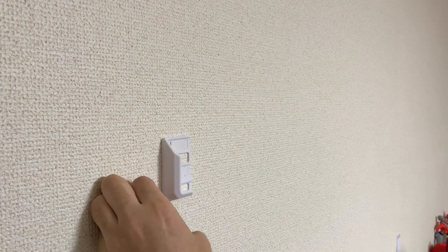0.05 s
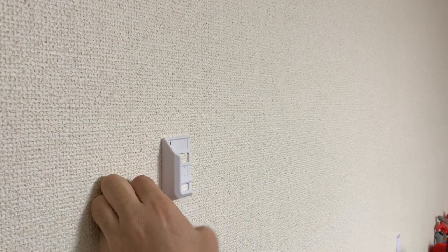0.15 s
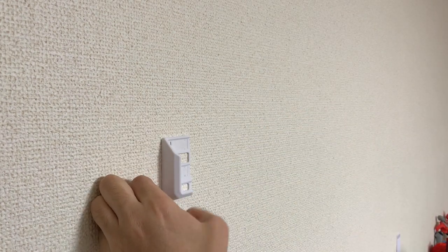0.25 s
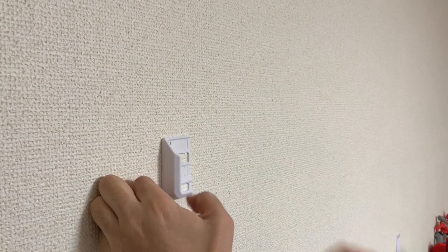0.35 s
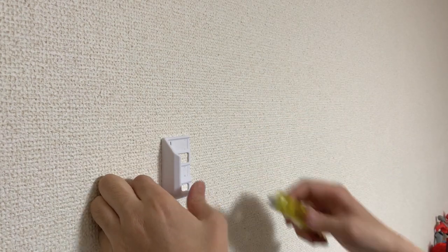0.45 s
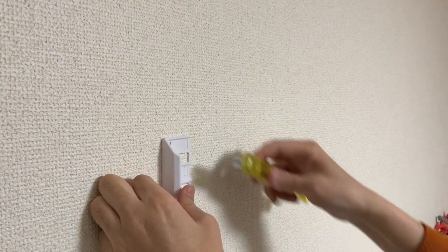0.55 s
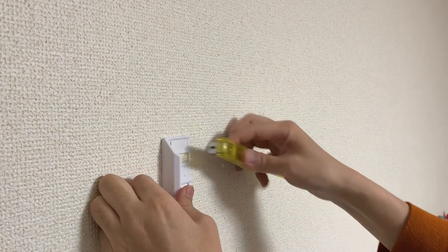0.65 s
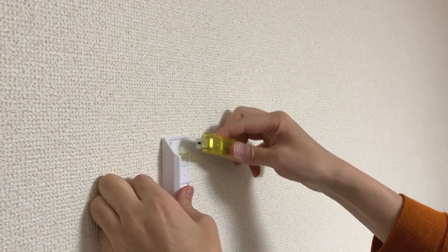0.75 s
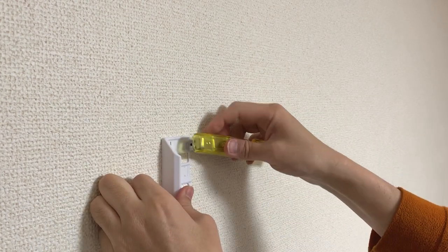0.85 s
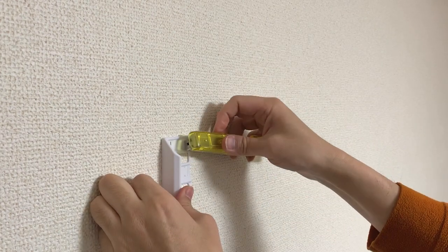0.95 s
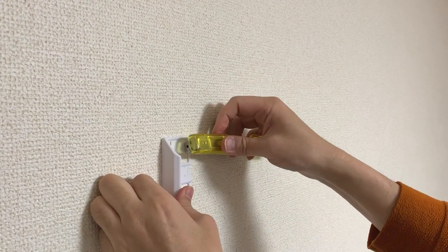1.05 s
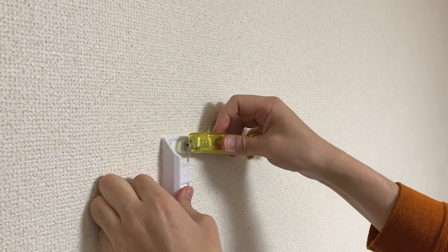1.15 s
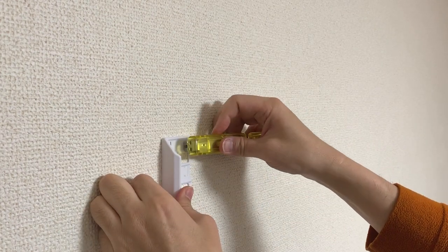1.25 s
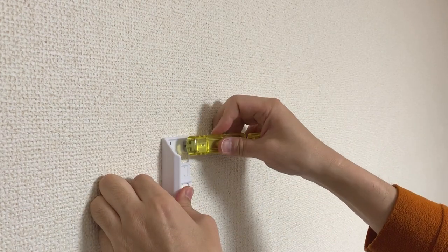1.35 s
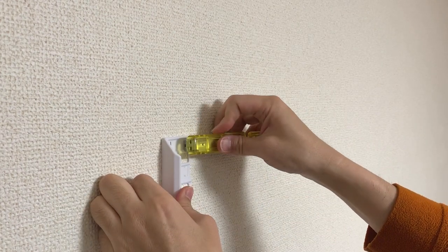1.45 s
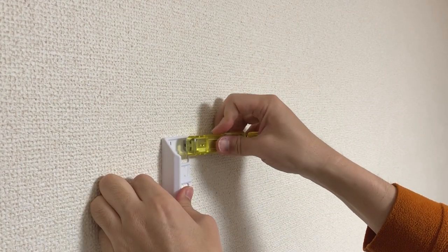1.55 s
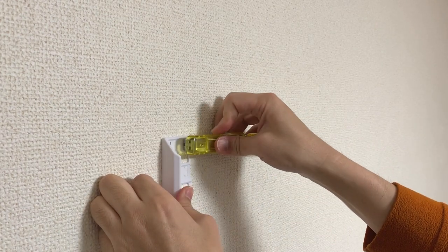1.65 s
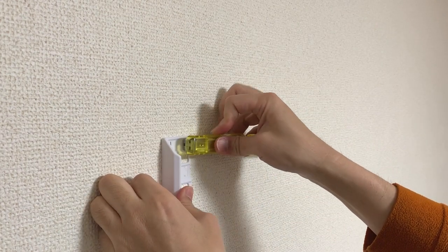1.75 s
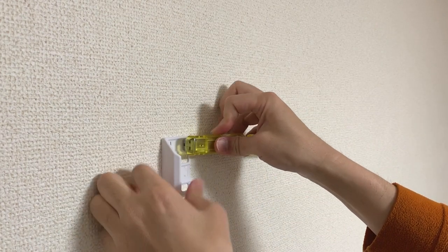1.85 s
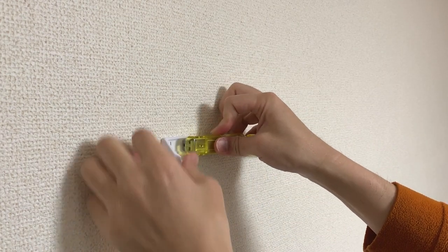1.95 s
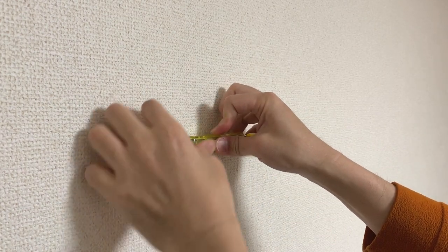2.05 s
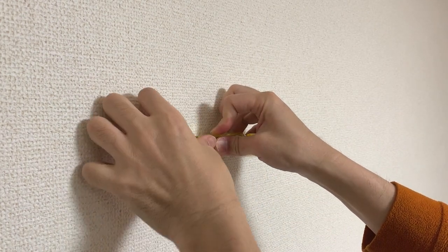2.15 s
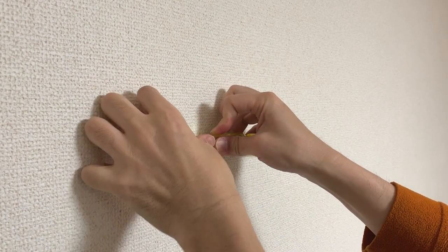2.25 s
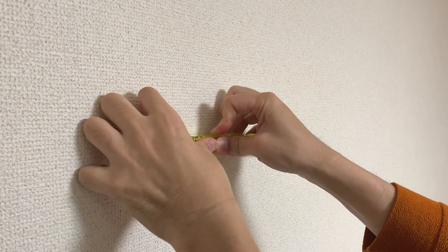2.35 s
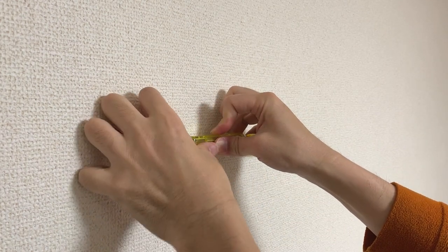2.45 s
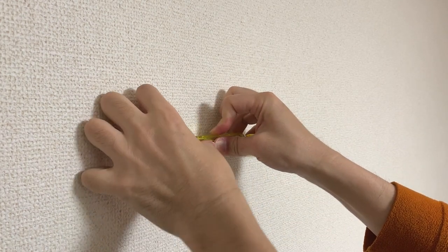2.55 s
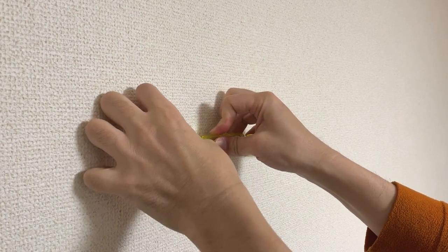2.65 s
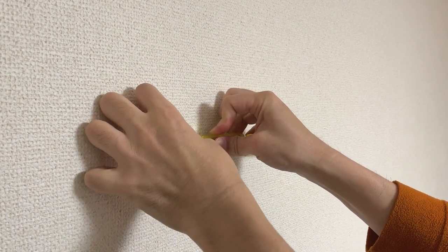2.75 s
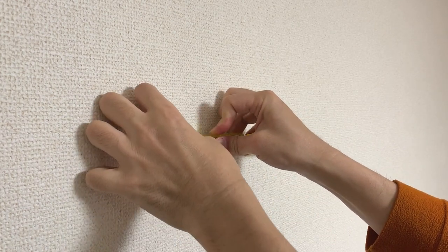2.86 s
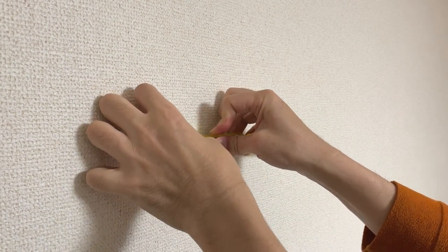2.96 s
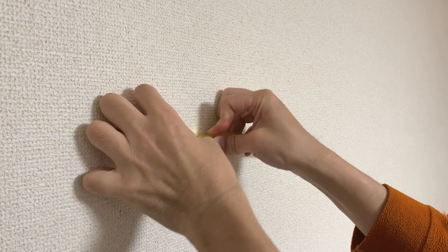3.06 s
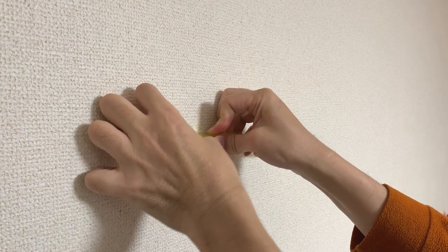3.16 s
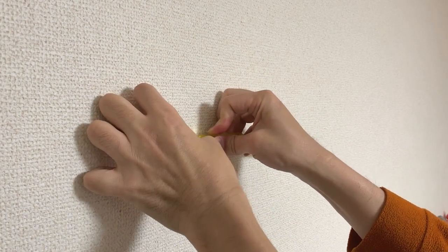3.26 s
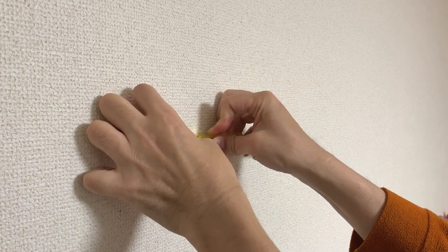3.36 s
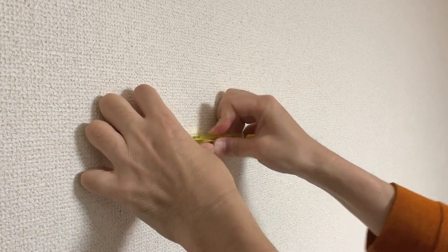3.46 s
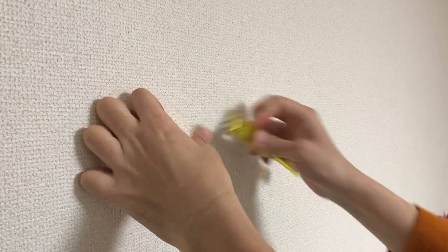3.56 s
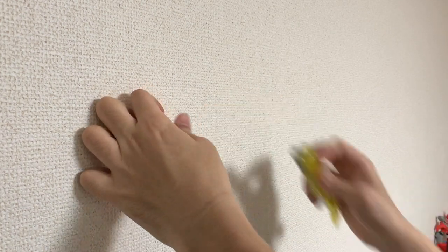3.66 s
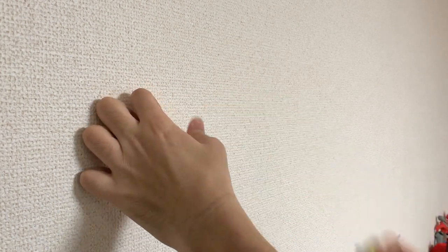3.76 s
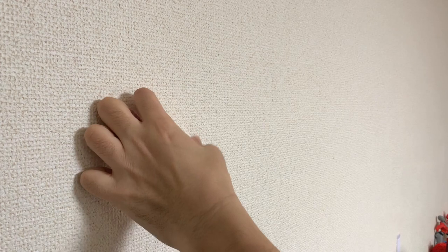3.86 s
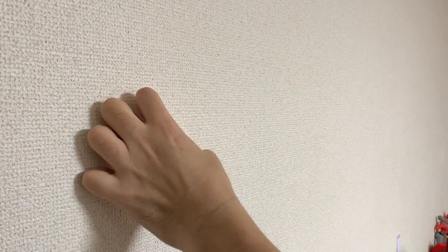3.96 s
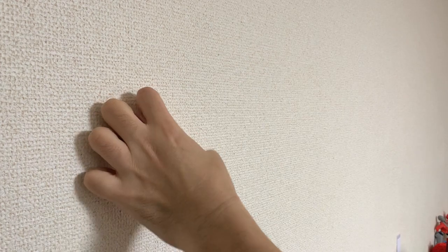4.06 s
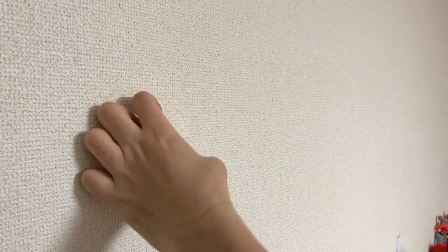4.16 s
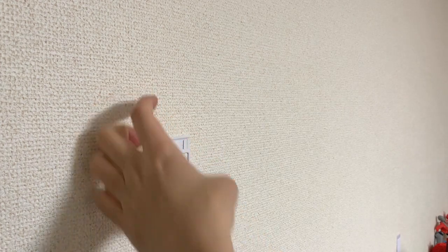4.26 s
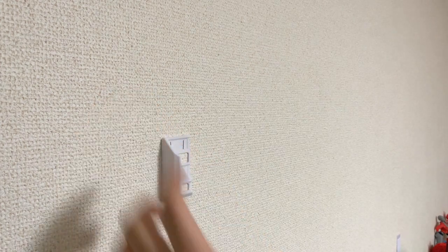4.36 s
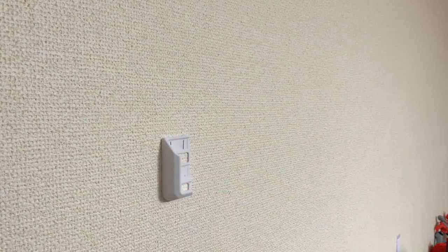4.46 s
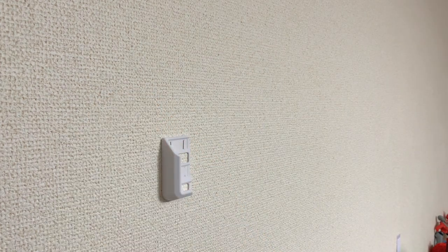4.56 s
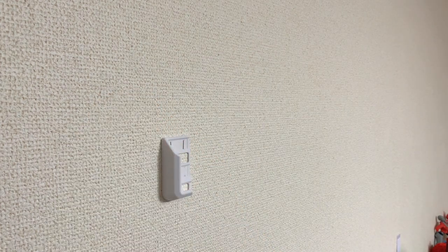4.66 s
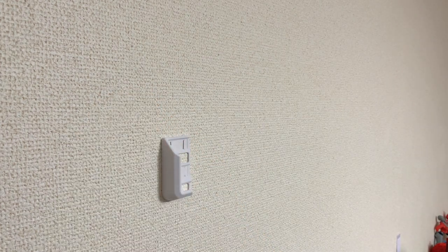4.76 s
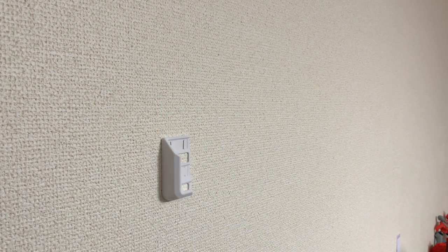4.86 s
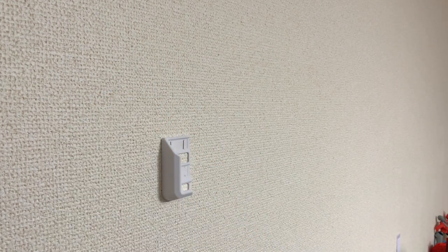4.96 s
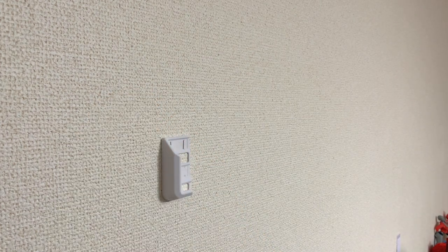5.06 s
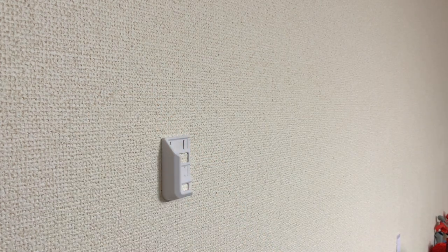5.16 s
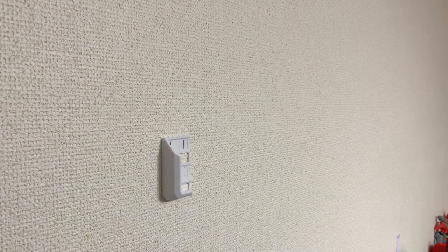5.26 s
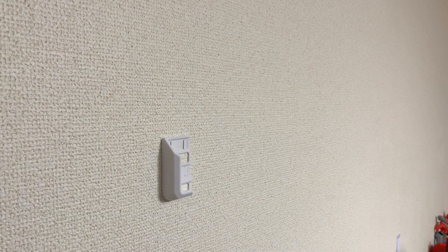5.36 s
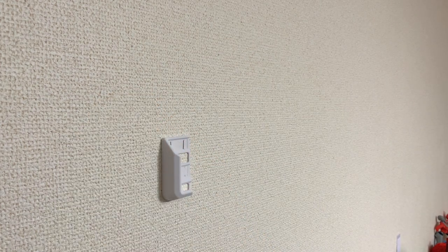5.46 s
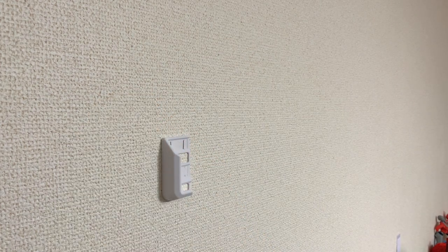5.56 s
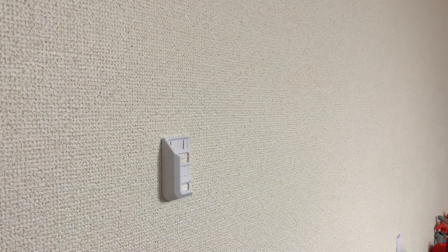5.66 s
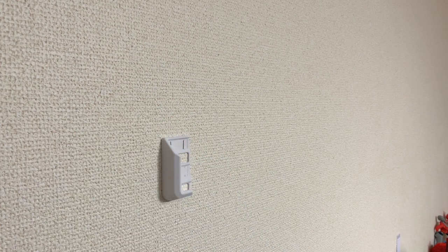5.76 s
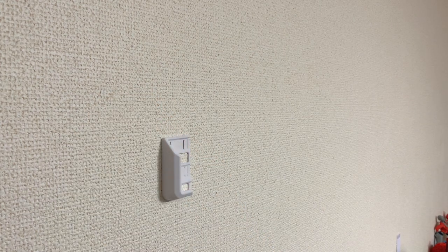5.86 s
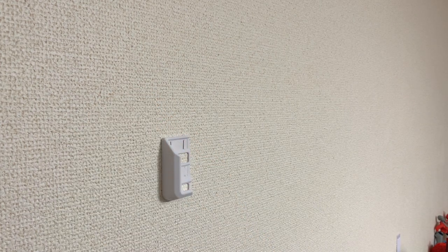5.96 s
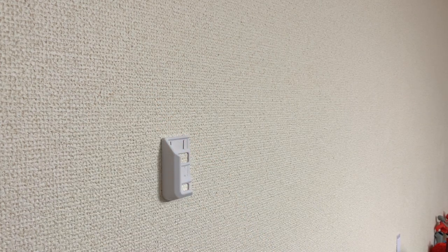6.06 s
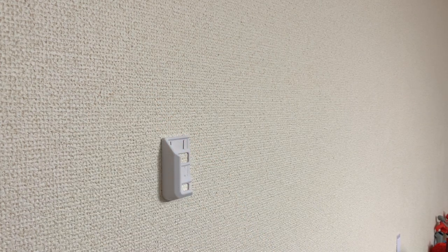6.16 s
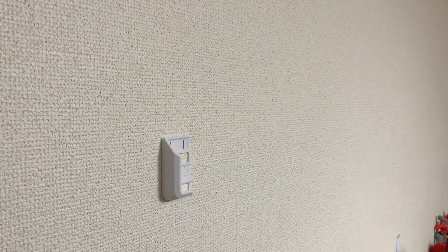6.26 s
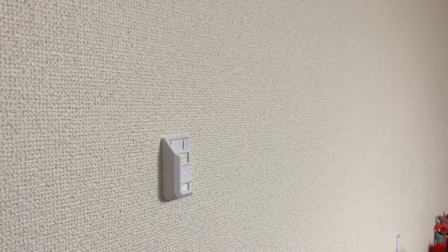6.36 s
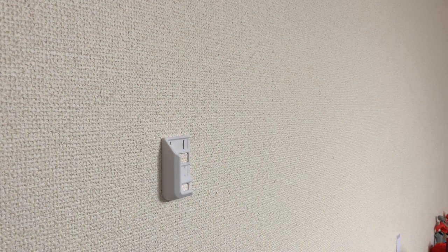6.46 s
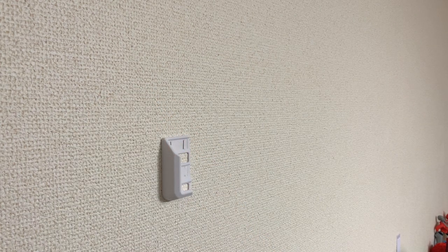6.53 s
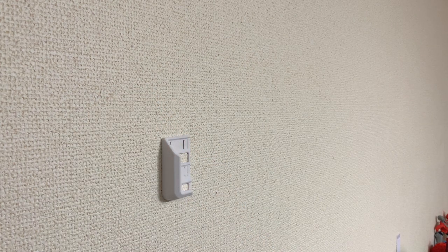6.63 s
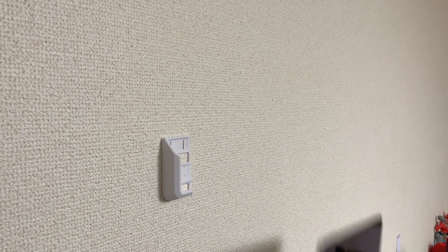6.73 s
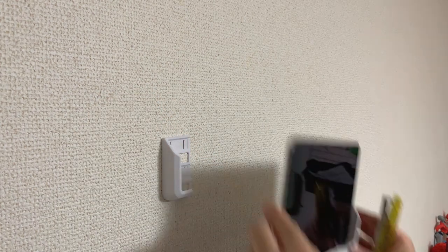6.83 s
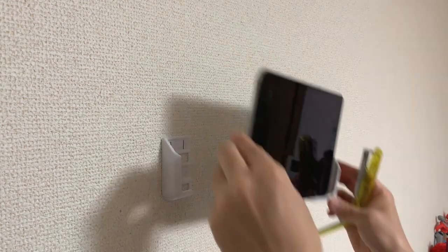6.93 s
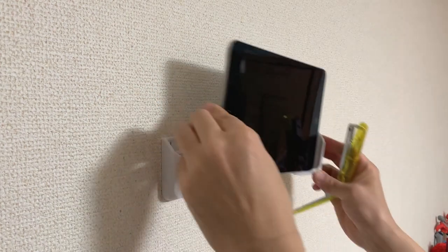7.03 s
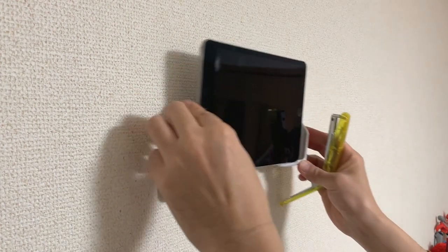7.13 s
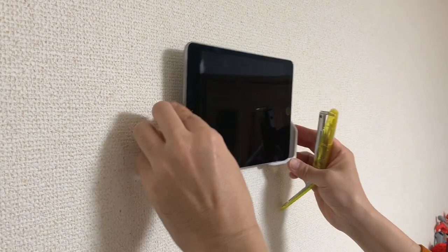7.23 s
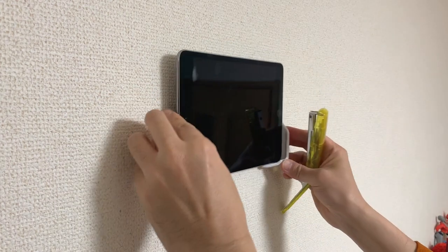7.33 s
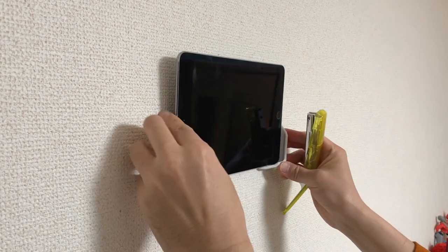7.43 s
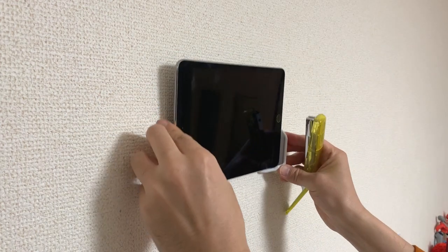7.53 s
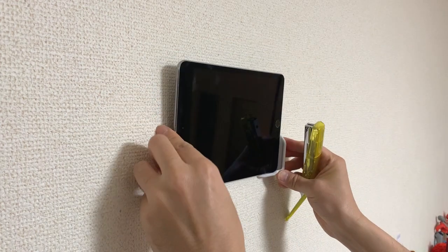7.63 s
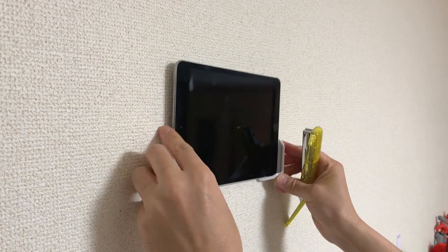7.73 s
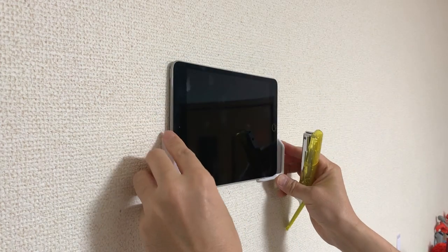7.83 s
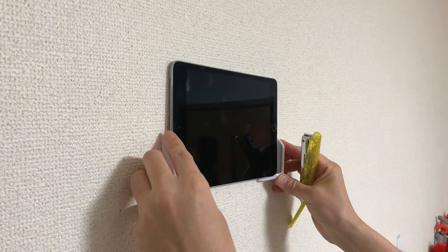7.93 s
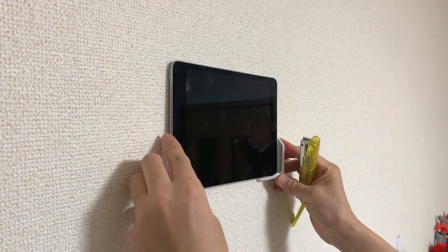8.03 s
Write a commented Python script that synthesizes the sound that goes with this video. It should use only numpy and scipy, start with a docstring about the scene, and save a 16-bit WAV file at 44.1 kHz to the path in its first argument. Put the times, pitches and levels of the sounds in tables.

```python
"""A small quiet room, a two-port microphone close to a hollow plaster wall.
First, hands rub and tap the wall, a plastic bracket and a tablet. At 2.6 s and 3.1 s a hand stapler
drives a staple through the bracket: a brief swell, a crack, the wall booms, the feed spring twangs.
At 3.5 s the stapler springs open and its steel arm rings out. From 4 s the hands are back,
scraping and tapping, and bump plastic against the wall near the end."""
import sys
import numpy as np
from scipy import signal
from scipy.fft import rfft, irfft, next_fast_len
from scipy.io import wavfile
from scipy.ndimage import uniform_filter1d

SR = 44100
rng = np.random.default_rng(int(sys.argv[2]) if len(sys.argv) > 2 else 0)


def bounce(signal):
    """Save signal as a 16-bit WAV file at the path given by the first command-line argument."""
    frames = np.transpose(np.atleast_2d(signal))
    limited = np.clip(frames, -1, 1)
    pcm = np.round(limited * 32767).astype(np.int16)
    wavfile.write(sys.argv[1], SR, pcm)


N = 356769

# the quiet room at the microphone: (frequency [Hz], level [dB])
ROOM_TONE = [(12, -37), (20, -5), (98, 0), (442, -25), (953, -23.5), (1190, -30.5), (2050, -33.5),
             (4180, -41.5), (5810, -45.5), (8300, -40), (10100, -48), (12500, -45), (14000, -65)]
# how alike the two ports hear the room tone: (frequency [Hz], coherence [0-1])
PORT_COHERENCE = [(60, 1), (180, 0.94), (520, 0.14), (1550, 0.04), (4580, 0.063), (13500, 0.04)]
# the room tone's deep bass grows: (time [s], gain [dB])
BASS_GROWTH = [(0, -4.5), (1.5, 2), (4, 1.95), (6.5, 4), (7.3, 9), (8.09, 10.5)]
# the room's reverberation: (frequency [Hz], t60 [s], relative level [dB])
ROOM_DECAY = [(79.5, 0.95, -11), (200, 0.3, -1.5), (562.6, 0.04, -1), (1500, 0.25, -7), (3900, 0.28, -7.5),
              (10360, 0.2, -3)]
# reflections off nearby walls: (delay [s], level [dB])
WALL_ECHOES = [(0.009, -19), (.023, -20), (.049, -16.5)]
# the hollow plaster panel: (frequency [Hz], relative level [dB], t60 [s])
WALL_MODES = [(115, -14, 0.074), (158, -5.5, 0.067), (219, 2, 0.016), (251, -4, 0.048), (271, -7, 0.031),
              (330, -5, 0.067), (434, -5, 0.036), (518, -0.5, 0.043), (572.5, -3.5, 0.12), (607, -4, 0.092),
              (642, -11, 0.17), (848, -6, .11), (876, -11, 0.14), (962, -13, 0.14), (1190, -12.5, 0.026),
              (1415, -5.5, 0.071), (1754, -14.5, 0.045)]

# friction spectra of wall, plastic, and skin and sleeve: (frequency [Hz], level [dB])
RUMBLE_SPECTRUM = [(50, -32.5), (100, 0), (170, -2), (300, 2.5), (450, 0), (700, -18), (1300, -23),
                   (2500, -61)]
SCRAPE_SPECTRUM = [(530, -24.5), (900, -3), (1270, -7), (1610, -7.5), (1900, -5.5), (3150, -18.5),
                   (3940, -13), (4580, -18), (6000, -30), (7800, -59), (13200, -120)]
HISS_SPECTRUM = [(2650, -4.5), (4500, 0), (5540, -1.5), (7300, 4.5), (8660, -1), (10400, -17), (12000, -6),
                 (13300, -8), (14000, -40)]
# a hand or an object slides:
# (start [s], rise [s], droop [s], rumble [dB], scrape [dB], hiss [dB], resonance [Hz])
HAND_STROKES = [(.708, 0.017, 0.026, -56, -93, -103, 4270), (.86, 0.037, 0.032, -76.5, -82, -81, 4100),
                (.995, 0.0026, 0.022, -38.5, -61.5, -81, 2250),
                (1.025, 0.019, 0.14, -46.5, -85, -102, 2240), (1.27, 0.052, 0.042, -58.5, -76, -100, 1710),
                (1.425, 0.0095, 0.0079, -46, -65, -59, 5100),
                (1.575, 0.0043, 0.062, -76, -66.5, -72.5, 3640), (1.66, 0.069, 0.01, -52.5, -99, -99, 1380),
                (1.76, 0.036, 0.018, -64, -79, -82, 2540), (1.9, 0.028, 0.11, -55.5, -78.5, -80, 1370),
                (2.05, 0.047, 0.082, -60.5, -77, -88, 1320), (2.23, 0.036, 0.027, -87, -74, -99, 4250),
                (2.4, 0.036, 0.028, -81, -74.5, -76, 1662), (4.112, 0.004, 0.044, -48, -59.5, -73, 1520),
                (4.15, 0.008, 0.16, -60, -72.5, -88, 4500), (4.25, 0.04, 0.039, -54, -79, -86, 1350),
                (4.602, 0.0046, 0.037, -63, -60.5, -55.5, 4600),
                (4.71, 0.072, 0.071, -81.5, -77.5, -86, 3680),
                (4.86, 0.021, 0.097, -65.5, -60, -65.5, 2230),
                (5.11, 0.007, 0.058, -79, -67.5, -71.5, 4820),
                (5.148, 0.0022, 0.021, -77.5, -81, -52, 4700), (5.19, 0.033, 0.071, -70, -71, -67.5, 4180),
                (5.56, 0.0011, 0.024, -44.5, -54, -54, 1820), (5.605, 0.075, 0.066, -67, -66, -59.5, 4070),
                (5.65, 0.065, 0.054, -54, -60.5, -63, 1810), (5.74, 0.036, 0.065, -52.5, -67, -73, 1341),
                (5.83, 0.009, 0.17, -61, -80, -74, 2130), (5.96, 0.08, 0.025, -71, -66, -66, 2350),
                (6.11, 0.075, 0.11, -74, -72, -62.5, 2200), (6.39, 0.054, 0.12, -62, -72.5, -88, 2260),
                (6.585, 0.011, .04, -81, -65.5, -84, 2460), (6.63, 0.031, .025, -82, -62, -63, 2260),
                (6.74, 0.0085, 0.03, -77.5, -60.5, -88, 2150), (7.202, 0.0068, 0.097, -49, -65, -68, 2400),
                (7.311, 0.0018, 0.039, -49, -51.5, -65, 2570), (7.39, 0.015, 0.055, -47.5, -55, -76, 1420),
                (7.598, 0.0019, 0.048, -34, -49, -61.5, 3930),
                (7.64, 0.016, 0.0089, -38.5, -50.5, -84, 1820), (7.74, 0.071, 0.0063, -51, -57, -79, 3900)]
# hands resting and shifting between strokes: (time [s], rumble [dB], scrape [dB])
RESTING_HANDS = [(0, -73.5, -95), (.95, -104, -99), (1.25, -69, -94), (1.5, -56.5, -81), (1.85, -68.5, -92),
                 (2.201, -75, -100), (2.5, -70, -103), (2.621, -99, -99), (3.751, -85.5, -99.5),
                 (4.001, -65, -82.5), (4.25, -83, -94), (4.401, -85, -79), (4.599, -75, -101),
                 (5.051, -74, -79), (5.4, -66, -79.5), (5.899, -69.5, -68.5), (6.55, -70, -78),
                 (6.851, -60.5, -74), (7.18, -62.5, -74.5), (7.499, -51, -63.5), (7.75, -52, -64.5),
                 (7.9, -56.5, -73), (8.09, -62, -75)]
# plastic bumps the wall: (time [s], level [dB], pitch [Hz], t60 [s])
PLASTIC_BUMPS = [(0.997, -27, 240, 0.049), (1.005, -25, 181, 0.06), (1.039, -27, 182, 0.095),
                 (1.069, -35, 230, 0.059), (1.113, -31.5, 206, 0.12), (1.144, -31, 265, 0.087),
                 (1.189, -39, 222, 0.08), (1.334, -45.5, 454, 0.096), (1.357, -35.5, 482, 0.036),
                 (1.442, -37, 370, 0.04), (1.527, -34, 229, 0.04), (1.571, -55, 221, 0.074),
                 (1.631, -33.5, 227, 0.073), (5.56, -35, 370, 0.051), (7.206, -24.5, 285, 0.078),
                 (7.212, -32.5, 191, 0.07), (7.244, -34, 211, 0.08), (7.324, -36, 245, 0.08),
                 (7.464, -24, 450, 0.022), (7.476, -24, 377, 0.038), (7.502, -46, 428, 0.08),
                 (7.549, -39, 384, 0.14), (7.6, -29, 275, 0.044), (7.611, -23.5, 381, 0.066),
                 (7.631, -34, 300, 0.067), (7.644, -27, 226, 0.08), (7.799, -39, 253.4, 0.12),
                 (7.82, -34.5, 174.6, 0.13)]
# fingers and plastic tap:
# (time [s], crack [dB], wall knock [dB], clack [Hz], clack over crack [dB], tilt [dB/octave])
LIGHT_TAPS = [(0.462, -58, -63, 1280, -14, 6), (0.5374, -54.5, -87, 1820, 2, 3),
              (0.543, -50.5, -75, 3740, 16, -2), (0.713, -56.5, -75, 4140, 16, 11),
              (0.911, -51.5, -70, 4070, 13, 8), (0.9939, -36, -49, 2340, -20, 18),
              (1.2971, -42, -55, 900, -14, -9), (1.3123, -50, -57, 1600, -6, -1),
              (1.4304, -40, -38, 8700, 1, -8.5), (1.575, -52, -50, 3380, 8, 1),
              (1.627, -50, -29, 1060, 1, 3), (1.7828, -58, -69, 2630, 1, -1),
              (2.429, -70, -74, 1710, -14.5, 7.5), (4.1104, -45, -34, 1560, -15, 10),
              (4.15, -40.5, -42, 4400, 0.5, 8), (4.1597, -44, -43.5, 4330, -18, 0),
              (4.6022, -38, -63, 4600, -8, 9), (4.609, -47, -70, 4730, 9, 7), (4.757, -58, -75, 4240, 8, 2),
              (4.798, -57, -67, 4620, 5, 2), (4.877, -52, -43, 1726, -20, -10),
              (4.9555, -49, -73, 2330, 11, -7), (5.1465, -43.5, -74, 7290, -29, 8),
              (5.561, -37.5, -40, 1830, -6, 2), (5.673, -38, -63.5, 1800, -7, 16),
              (5.7057, -42.5, -62, 1740, 9, -6), (5.7642, -41, -58, 1160, -25, -7.5),
              (5.8146, -41, -72, 2200, 3, 6.5), (5.8608, -42.5, -38, 1820, -11, 4.5),
              (6.032, -45, -39, 2220, -1, 6), (6.3014, -51.5, -57, 3345, -1, 5),
              (6.443, -45.5, -64, 2366, -14, 12), (6.6478, -49, -65, 2200, 6, 4),
              (6.7422, -41, -60, 1744, -7, 3), (7.202, -46, -20.5, 3500, -8, -9),
              (7.3107, -39.5, -32, 1840, -4, 0), (7.323, -42, -53, 2450, 2, -3.5),
              (7.333, -47, -50, 2600, 8, -6), (7.3868, -39.5, -46, 4000, 1, 0.5),
              (7.408, -39.5, -24, 1194, -2, -4), (7.4645, -40, -42, 990, 3, -8),
              (7.506, -55, -60, 4000, 4, 8), (7.599, -38.5, -15, 3850, -21, 0.5),
              (7.629, -35, -31.5, 1470, -5, -3), (7.636, -40, -19, 935, 8, -2),
              (7.644, -38.5, -55, 4440, 7, -4), (7.658, -37.5, -57, 4700, 2, -1),
              (7.6594, -36, -47, 1750, 4, -18), (7.699, -45.5, -42, 1490, -20, -4),
              (7.776, -49, -49, 3970, 11, -6), (7.787, -45, -60, 3890, 8, -8),
              (7.7918, -39.5, -52, 4010, 15, -7), (7.797, -55, -45, 3990, 3, -3),
              (7.8193, -41, -27.5, 1940, -10, -8), (7.8403, -45.5, -65.5, 1515, -1, -7.5),
              (7.935, -54, -29.5, 1290, -5, -0.5)]
# the taps' treble is dulled, with a deep dip near 10.6 kHz: (frequency [Hz], gain [dB])
TAP_TONE = [(4500, -0.5), (6300, -2), (9000, -8), (10600, -27), (12600, -14)]
# the noise of a sudden slip: (frequency [Hz], level [dB])
CRACK_SPECTRUM = [(350, -22.5), (600, -5.5), (1590, -23.5), (2070, -21.5), (2700, -16), (3790, -17),
                  (4680, -17.5), (5900, -28), (6800, -25), (8140, -23), (9600, -27), (10500, -39),
                  (11400, -37.5), (12500, -29.5), (14000, -46)]

# impacts within the stapler:
# (time [s], crack [dB], wall knock [dB], clack [Hz], clack over crack [dB], tilt [dB/octave])
STAPLER_BLOWS = [(2.615, -3, -15, 1250, -8, 1, 0.013), (2.6172, -10.5, -6, 650, 4.5, -0.5, 0.014),
                 (2.6157, -16.5, -7.5, 785, 5, -6, 0.048), (2.6286, -19, -3.5, 3570, -4.5, 1, 0.013),
                 (3.057, -26.5, -12.5, 1373, -9, -1, 0.024), (3.073, -33.5, -16, 7750, -5, -5.5, 0.048),
                 (3.0837, -10.5, -8.5, 1550, 6, 1.5, 0.016), (3.086, -4, 2.5, 950, 7.5, -7.5, 0.012),
                 (3.0861, -8, -21.5, 2780, -5, 2, 0.013), (3.1006, -22, -19.5, 1520, -2, -0.5, 0.0044),
                 (3.326, -38.5, -56.5, 1880, -1.5, -1.5, 0.028),
                 (3.333, -41.5, -48.5, 1767, 3.5, -2.5, 0.085), (3.345, -44.5, -58.5, 1297, 4, -2, 0.057),
                 (3.5084, -56, -57.5, 2890, 11, 7, 0.026), (3.514, -43.5, -37.5, 7320, -13, 0, 0.038),
                 (3.5346, -24, -25.5, 2162, 9, -3, 0.031), (3.539, -33.5, -29, 1454, -1, -1.5, 0.021),
                 (3.543, -29, -32.5, 2830, 3.5, 8.5, 0.076), (3.549, -14.5, -33, 7840, -2, 2.5, 0.012),
                 (3.5546, -26, -27.5, 2600, 17, 3, 0.014), (3.558, -28, -28, 8600, -4.5, -8, 0.012),
                 (3.563, -21.5, -46, 2850, -4.5, -9, 0.016), (3.568, -33, -30, 3460, -6, -5, 0.0083),
                 (3.581, -41, -47.5, 2930, -4, -11.5, 0.011)]
# brief swells of noise and tone that rise into the blows and stop dead:
# (end [s], level [dB], clack [Hz], clack over crack [dB], tilt [dB/octave], 60 dB swell time [s])
BLOW_SWELLS = [(2.6135, -26, 764, 7, -1, 0.04), (2.613, -22.5, 3000, 0.5, 0.5, 0.04),
               (3.059, -41, 1300, 1, -2.5, 0.1), (3.084, -23.5, 900, 3.5, -3.5, -0.22),
               (3.5145, -52, 2510, -1, 2, 0.1), (3.533, -31, 2370, -1, -5, -0.02)]
# the wall booms after each staple: (time [s], level [dB], pitch [Hz], t60 [s])
WALL_BOOMS = [(2.6185, -13.5, 275, 0.039), (2.6245, -14.5, 233, 0.039), (2.6275, -7, 415, 0.013),
              (2.636, -16, 471, 0.13), (2.659, -13, 204.5, 0.062), (3.0875, -4.5, 263.5, 0.059),
              (3.089, -19.5, 112, 0.29), (3.0935, -9, 198, 0.066), (3.131, -14, 196, 0.098)]
# the feed spring is set ringing: (start [s], stop [s], level [dB], overtone gain [dB])
SPRING_TWANGS = [(2.619, 3.073, -20, 4), (3.098, 3.55, -27.5, -9)]
# the stapler's shell, feed spring and opened arm: (frequency [Hz], relative level [dB], t60 [s])
SHELL_MODES = [(1376, 0.5, 0.22), (2060, -25, 1.3), (2350, -10, 0.34), (3400, -14, 0.21),
               (3628, -19.5, 0.5), (4083, -7, 0.14), (4100, -10, 0.28), (5000, -10, 0.056),
               (4770, -14.5, 0.082), (5353, -16, 0.17), (6000, -19.5, 0.37), (6500, -12, 0.18),
               (7363, -22, 0.43), (8500, -16.5, 0.15)]
SPRING_MODES = [(293, -2.5, 1.2), (592, -8, .7), (915, -8, .5), (1351, -26, .5), (1470, -28, .6),
                (2040, -23, .5), (2417, -20, .65), (2492, -14, .37), (2697, -19, .45), (3036, -16, .37),
                (3101, -13, .32), (3268, -23, .6), (3623, -11, .45), (3805, -23, .9), (4100, -12, .9),
                (4160, -16, .5), (4662, -16, .2)]
ARM_MODES = [(1249, -8, .55), (1997, 2, 1), (2396, -2, .26), (3435, -4, .22), (4242, -14, .3),
             (4570, -10, .25)]
# the bracket as heard from the microphone: (frequency [Hz], left over right [dB])
PORT_BALANCE = [(200, 0), (450, 2.5), (750, 1.5), (1050, 5), (1700, 3.5), (2500, -1), (5000, -1.5),
                (7000, 1), (13000, .5)]
# the same paths in phase, tapered away below 1 kHz in use: (frequency [Hz], left lead [rad])
PORT_LEAD = [(0, 1.5), (900, .5), (1350, -.3), (1750, .5), (2250, 1.9), (3250, 1.7), (4000, 2.9), (5300, 3),
             (6200, .2), (7200, 0), (8200, -1), (9200, -2.2), (10000, -3.2), (11200, -3.3), (12200, -5.3),
             (13200, -6.5)]

ROOM_TONE_DB, DEEP_BASS_HZ = -58.5, 97
SAG_DB, RELEASE_DB_PER_S = -8.5, -350  # each stroke droops by this much, then lets go
GRIT_PER_S, GRIT_SPREAD_DB, GRIT_DB = 240, 4.5, -7
CRACK_SAMPLES, CRACK_RISE_S, RING_SHARE = 4096, .00038, .19
STEEL_WIDTH, PLASTIC_WIDTH = .1, .18  # bandwidth of a clack as a share of its pitch
TAP_PAN_DB, TAP_REVERB_DB = 5.5, -6
SHELL_DB, ARM_OPEN_S, ARM_DB = -23.5, 3.55, -47.5  # the shell's level is relative to its crack
TWIN_GAIN, TWIN_DETUNE = .6, .008
CEILING, BAND_EDGE_HZ = .95, 13700


def gain_of(db):
    return 10 ** (np.asarray(db) / 20)


def unit_rms(x):
    return x / np.sqrt(np.mean(x ** 2) + 1e-20)


def curve_at(points, hz):
    f, value = np.transpose(points)
    return np.interp(np.log(hz + 1), np.log(f + 1), value)


def add(mix, s, sound):
    part = mix[..., round(s * SR):][..., :sound.shape[-1]]
    part += sound[..., :part.shape[-1]]


def coloured(x, spectrum, tilt_db=0.):
    """Filters by a spectrum, tilted by tilt_db per octave about 3 kHz."""
    size = next_fast_len(x.shape[-1])
    hz = np.fft.rfftfreq(size, 1 / SR)
    slope_db = tilt_db * np.log2((hz + 50) / 3000)
    return irfft(rfft(x, size) * gain_of(curve_at(spectrum, hz) + slope_db), size)[..., :x.shape[-1]]


def ring(modes, size, travel=0.):
    """Sum of dying sines, peak 1; bending waves bring each mode travel / sqrt(Hz) seconds late."""
    x = np.zeros(size)
    for hz, db, t60 in modes:
        t = np.maximum(np.arange(size) / SR - travel / np.sqrt(hz), 0)
        x += gain_of(db - 60 * t / max(t60, .01)) * np.sin(2 * np.pi * hz * t)
    return x / abs(x).max()


def room_tone():
    """Faint, drifting noise all round the microphone, alike at both ports in the bass."""
    frames, hz = N // 512 + 5, np.fft.rfftfreq(2048, 1 / SR)
    a, b, c, d, patches = rng.standard_normal((frames, 1025, 5)).T
    patches = unit_rms(uniform_filter1d(uniform_filter1d(patches, size=12, axis=0), size=10, axis=1))
    drift_db = .62 * patches * np.clip(hz / 400, .3, 1)[:, None]
    coherence = curve_at(PORT_COHERENCE, hz)[:, None]
    left = a + 1j * b
    right = coherence * left + np.sqrt(1 - coherence ** 2) * (c + 1j * d)
    growth_db = np.interp(np.arange(frames) * 512 / SR, *np.transpose(BASS_GROWTH))
    bass_db = np.outer(1 / (1 + (hz / DEEP_BASS_HZ) ** 4), growth_db)
    spectra = np.array([left, right]) * gain_of(curve_at(ROOM_TONE, hz)[:, None] + drift_db + bass_db)
    return gain_of(ROOM_TONE_DB) * unit_rms(signal.istft(spectra, nperseg=2048, noverlap=1536)[1][:, :N])


def room_reverb(x, tail_db):
    """The small room answers with a few echoes and a tail, each band dying at its own speed."""
    reflections = np.zeros((3, SR))
    arrivals = np.arange(200, SR - 20, 20) + rng.integers(0, 20, (3, (SR - 201) // 20))
    np.put_along_axis(reflections, arrivals, rng.choice([-1., 1.], arrivals.shape), 1)
    hz, t, bands = signal.stft(reflections, SR, nperseg=256)
    t60, db = (curve_at([(row[0], row[k]) for row in ROOM_DECAY], hz)[:, None] for k in (1, 2))
    width = np.clip(hz / 1500, .3, 1)[:, None]  # the ports share most of the bass
    bands = np.sqrt(1 - width ** 2) * bands[0] + width * bands[1:]
    tail = signal.istft(bands * gain_of(db - 60 * t / t60), SR, nperseg=256)[1]
    tail *= gain_of(tail_db) / np.linalg.norm(tail[0])
    for s, db in WALL_ECHOES:
        add(tail, s, gain_of(db) * signal.windows.hann(48) / 24)  # soft surfaces return them dull
    return signal.fftconvolve(x, tail, axes=1)[:, :N]


def grit():
    """Crackle envelope: sparse slips of uneven size, each about a millisecond long."""
    sizes = gain_of(GRIT_SPREAD_DB * np.minimum(rng.exponential(1, N), 4))
    slips = sizes * (rng.random(N) < GRIT_PER_S / SR)
    burst = np.exp(-np.arange(200) / SR / .0008)
    return gain_of(GRIT_DB) * unit_rms(signal.oaconvolve(slips, burst)[:N])


def resonate(x, hz, width_hz):
    """A moving resonance: shifts the curve hz down to zero, smooths, and shifts back."""
    turn = np.exp(2j * np.pi * np.cumsum(hz) / SR)
    pole = np.exp(-np.pi * width_hz / SR)
    return 2 * (turn * signal.lfilter([1 - pole], [1, -pole], x / turn)).real


def hand_effort():
    """Strokes over resting hands: gains of rumble, scrape, hiss and hollow note, and that note's pitch."""
    t, u = np.arange(N) / SR, np.arange(SR // 2) / SR
    rest_s, *rest_db = np.transpose(RESTING_HANDS)
    power, hollow_hz = np.zeros((4, N)), np.full(N, float(HAND_STROKES[0][-1]))
    power[:2] = [gain_of(2 * np.interp(t, rest_s, db)) for db in rest_db]
    for start, rise, droop, rumble_db, scrape_db, hiss_db, hz in HAND_STROKES:
        attack = np.minimum(u / rise, 1) ** .78
        sag_db = SAG_DB * np.clip((u - rise) / droop, 0, 1)
        release_db = RELEASE_DB_PER_S * np.maximum(u - rise - droop, 0)
        levels_db = np.add.outer([rumble_db, scrape_db, hiss_db, scrape_db], sag_db + release_db)
        add(power, start, (attack * gain_of(levels_db)) ** 2)
        hollow_hz[t >= start] = hz  # each grip holds its own pitch
    return np.sqrt(power), hollow_hz


def friction(spectrum, grain_db, width, gritty):
    """Rubbing noise with a grainy level; width sets how much the two ports differ."""
    noise = rng.standard_normal((3, N))
    grain = gain_of(grain_db * unit_rms(uniform_filter1d(rng.standard_normal(N), size=200)))
    if gritty:
        grain += grit()
    return unit_rms(coloured((noise[0] + width * noise[1:]) * grain, spectrum))


def rubbing_hands():
    """Close and dry: rumble through the wall, hollow scrape of plastic, hiss of skin and sleeve."""
    gains, hollow_hz = hand_effort()
    rumble = friction(RUMBLE_SPECTRUM, grain_db=2.6, width=.25, gritty=False)
    rumble = unit_rms(signal.oaconvolve(rumble, ring(WALL_MODES, size=8192)[None])[:, :N])
    scrape = friction(SCRAPE_SPECTRUM, grain_db=2.6, width=.8, gritty=True)
    hiss = friction(HISS_SPECTRUM, grain_db=2.2, width=.9, gritty=True)
    crackle = rng.standard_normal((2, N)) * (1 + grit())
    hollow = gain_of(-2) * unit_rms(resonate(crackle, hollow_hz, width_hz=210))
    return sum(layer * gain for layer, gain in zip((rumble, scrape, hiss, hollow), gains))


def wall_bumps(rows, rise_s):
    """The struck wall gives a hollow tone with one overtone, swelling quickly and dying."""
    out, t = np.zeros(N), np.arange(8192) / SR
    for s, db, hz, t60 in rows:
        tone = ring([(hz, 0, t60), (hz * 1.91, -14, t60 / 2)], size=len(t))
        add(out, s, gain_of(db) * tone * (1 - np.exp(-t / rise_s)))
    return out


def wall_knocks(rows, contact_s):
    """Short pushes ring the wall panel, treble reaching the microphone first."""
    force, u = np.zeros(N), np.arange(600) / SR / contact_s
    push = u * np.exp(-u)
    for s, _, knock_db, *_ in rows:
        add(force, s, gain_of(knock_db) * push / push.sum())
    return signal.oaconvolve(force, ring(WALL_MODES, size=16384, travel=.04))[:N]


def crack(db, hz, clack_db, tilt_db, t60, width):
    """Metal and plastic slip: a burst of bright noise, part of it caught in one hollow resonance."""
    t = np.arange(CRACK_SAMPLES) / SR
    burst, drive = rng.standard_normal((2, CRACK_SAMPLES))
    pole = np.exp(-np.pi * width * hz / SR)
    band = signal.lfilter([1, 0, -1], [1, -2 * pole * np.cos(2 * np.pi * hz / SR), pole ** 2], drive)
    clack = (1 - RING_SHARE) * unit_rms(band) + RING_SHARE * np.sqrt(2) * np.sin(2 * np.pi * hz * t)
    bright = unit_rms(coloured(burst, CRACK_SPECTRUM, tilt_db))
    envelope = gain_of(db - 60 * t / max(t60, .004)) * (1 - np.exp(-t / CRACK_RISE_S))
    return envelope * unit_rms(bright + gain_of(clack_db) * unit_rms(clack))


def finger_taps():
    """Light contacts: a small tick left of the microphone and a soft knock in the wall."""
    ticks = np.zeros(N)
    for s, db, _, *colour in LIGHT_TAPS:
        add(ticks, s, crack(db, *colour, t60=.025, width=PLASTIC_WIDTH))
    ticks = coloured(ticks, TAP_TONE)
    ports = np.array([ticks, np.roll(ticks, 4)])  # the right port hears it later
    ports *= gain_of([[TAP_PAN_DB / 2], [-TAP_PAN_DB / 2]])
    return ports + wall_knocks(LIGHT_TAPS, contact_s=.0006)


def thin_steel(modes):
    """Thin steel flutters: each mode above 1 kHz beats against two weaker, detuned twins."""
    twins = [(hz * (1 + TWIN_DETUNE * rng.uniform(-1, 1)), db + 20 * np.log10(TWIN_GAIN), .8 * t60)
             for hz, db, t60 in modes * 2 if hz > 1000]
    return ring(modes + twins, size=SR)


def from_bracket(x):
    """Sound from the bracket takes a different path to each port, shifting level and phase."""
    size = next_fast_len(N)
    hz, spectrum = np.fft.rfftfreq(size, 1 / SR), rfft(x, size)
    lead = curve_at(PORT_LEAD, hz) * np.clip(hz / 1000, 0, 1)
    half = gain_of(curve_at(PORT_BALANCE, hz) / 2) * np.exp(.5j * lead)
    return np.array([irfft(spectrum * half, size), irfft(spectrum / half, size)])[:, :N]


def stapler():
    """Close up, each blow cracks, rings the shell and knocks the wall; spring and arm sing on."""
    out = wall_knocks(STAPLER_BLOWS, contact_s=.00018) + wall_bumps(WALL_BOOMS, rise_s=.00054)
    for s, db, _, *colour in STAPLER_BLOWS:
        add(out, s, crack(db, *colour, STEEL_WIDTH))
        shell = [(hz * rng.uniform(.99, 1.01), mode_db + 4 * rng.standard_normal(), min(t60, .2))
                 for hz, mode_db, t60 in SHELL_MODES]
        add(out, s, gain_of(db + SHELL_DB) * ring(shell, size=16384))
    for end_s, db, *colour in BLOW_SWELLS:
        swell = crack(db, *colour, STEEL_WIDTH)[::-1]  # rises, then stops dead
        add(out, end_s - CRACK_SAMPLES / SR, swell)
    for s, stop_s, db, overtone_db in SPRING_TWANGS:
        spring = [(hz, mode_db + overtone_db * (hz > 400), t60) for hz, mode_db, t60 in SPRING_MODES]
        damping = np.clip((stop_s - s - np.arange(SR) / SR) / .03, 0, 1)
        add(out, s, gain_of(db) * thin_steel(spring) * damping)
    add(out, ARM_OPEN_S, gain_of(ARM_DB) * thin_steel(ARM_MODES))
    return from_bracket(out)


def scene():
    """Stapler and hands close to the microphone, the small room behind them."""
    # small parts and a stiff panel radiate deep bass poorly
    bass_cut = signal.butter(4, 115, "high", fs=SR, output="sos")
    stapling = signal.sosfilt(bass_cut, stapler())
    handling = signal.sosfilt(bass_cut, finger_taps() + wall_bumps(PLASTIC_BUMPS, rise_s=.0064))
    reverb = room_reverb(stapling + gain_of(TAP_REVERB_DB) * handling, tail_db=-4)
    return stapling + handling + reverb + rubbing_hands() + room_tone()


def record(dry):
    """The microphone's input stage rounds off the highest peaks; then the top treble is cut."""
    lowpass = signal.firwin(511, BAND_EDGE_HZ, window=("kaiser", 9), fs=SR)
    return signal.oaconvolve(CEILING * np.tanh(dry / CEILING), lowpass[None], "same")


dry = scene()
out = record(dry)
bounce(out)
```